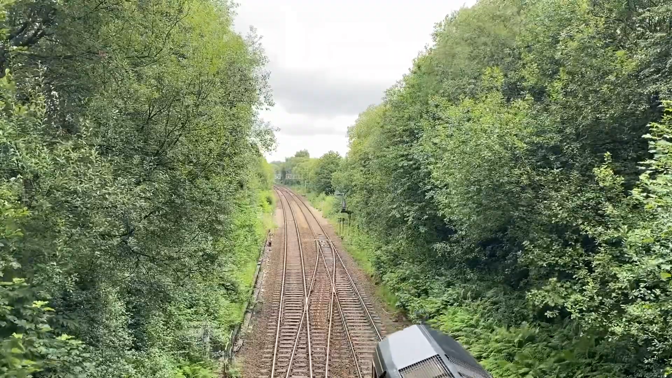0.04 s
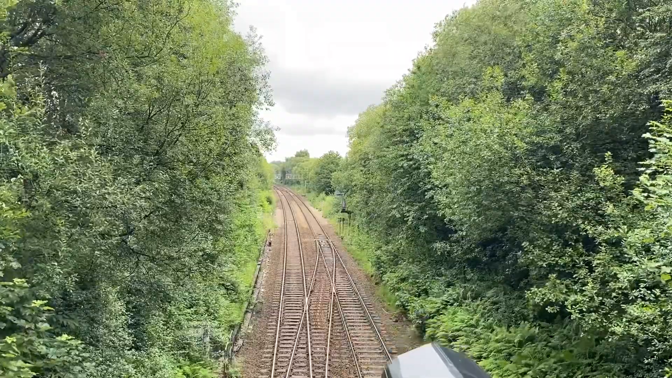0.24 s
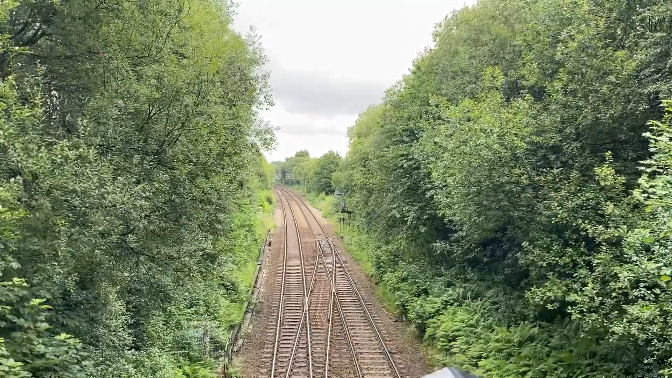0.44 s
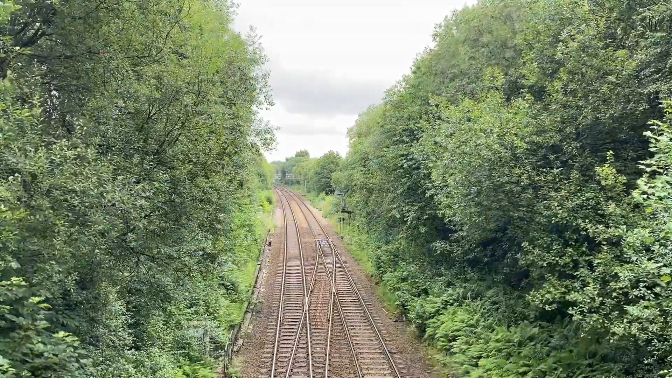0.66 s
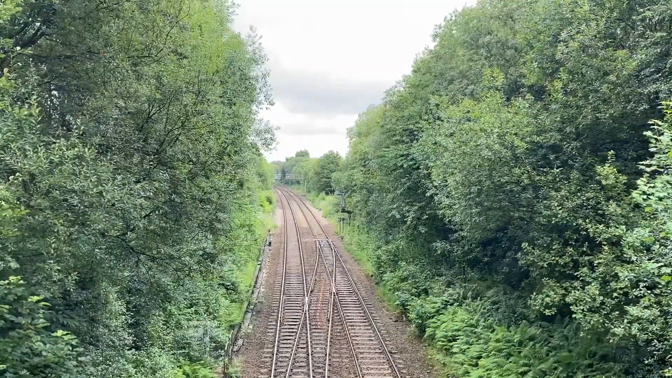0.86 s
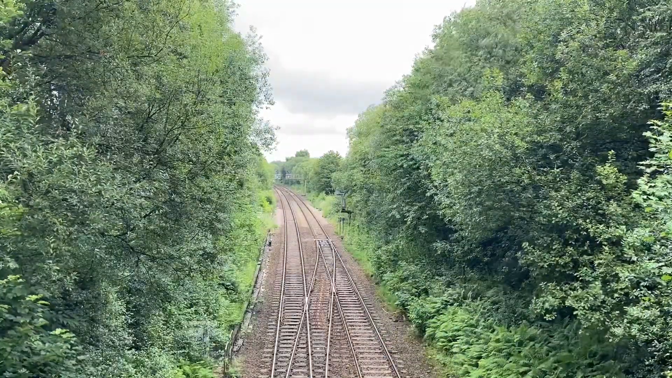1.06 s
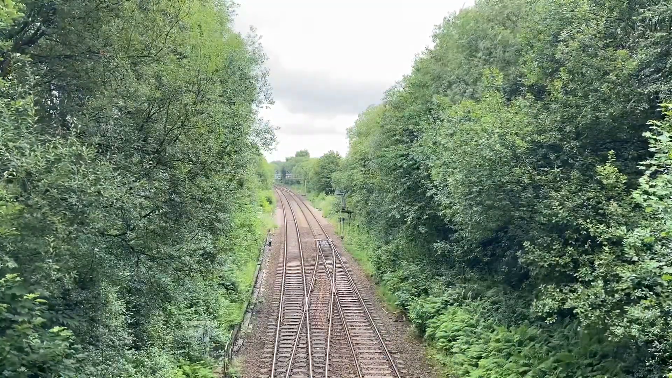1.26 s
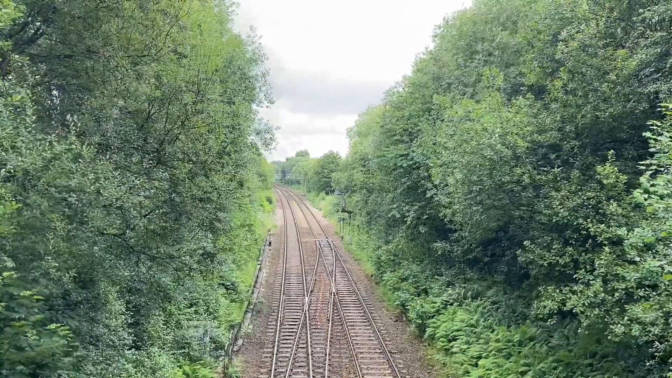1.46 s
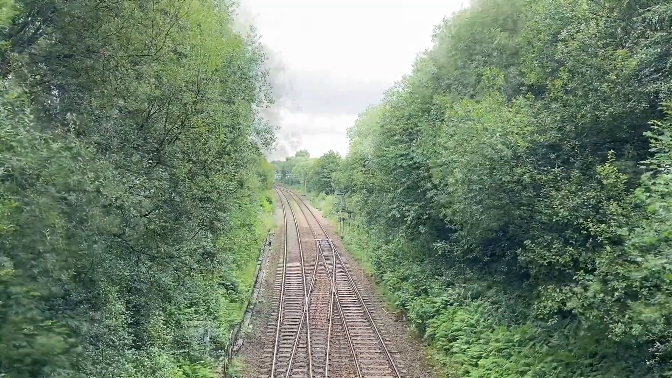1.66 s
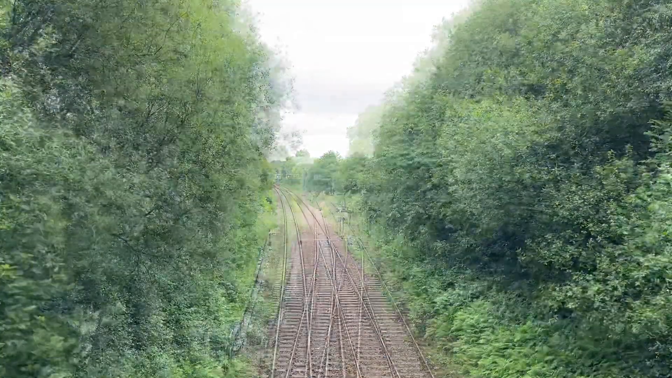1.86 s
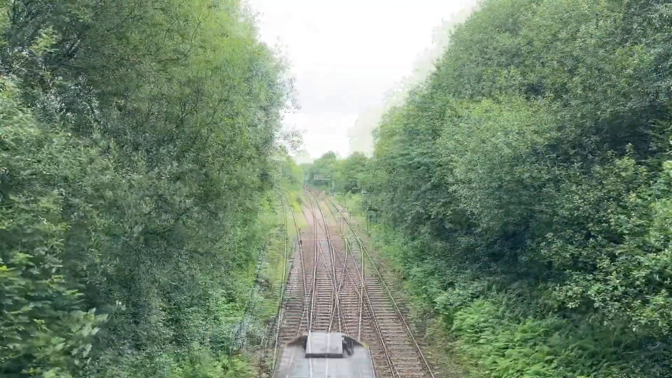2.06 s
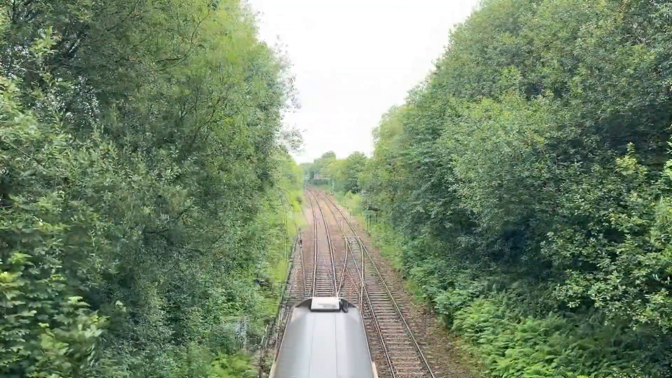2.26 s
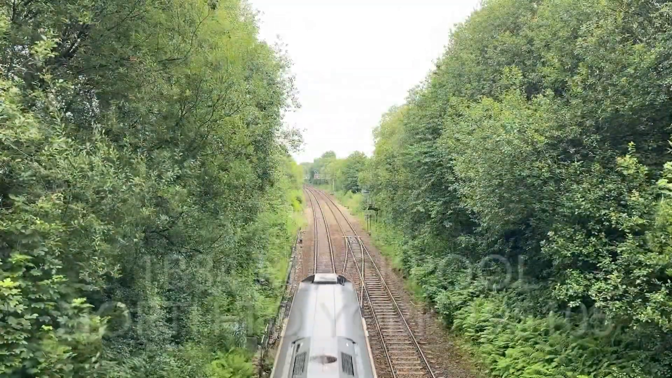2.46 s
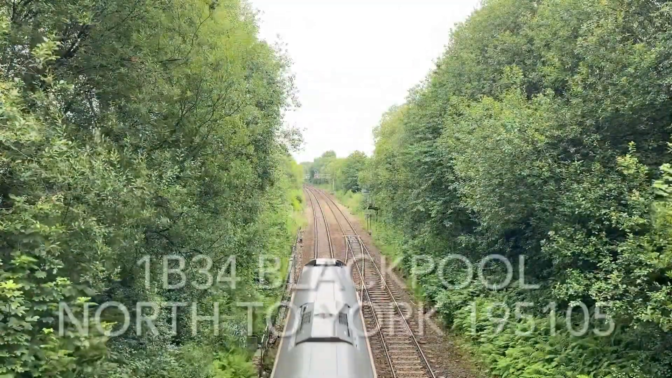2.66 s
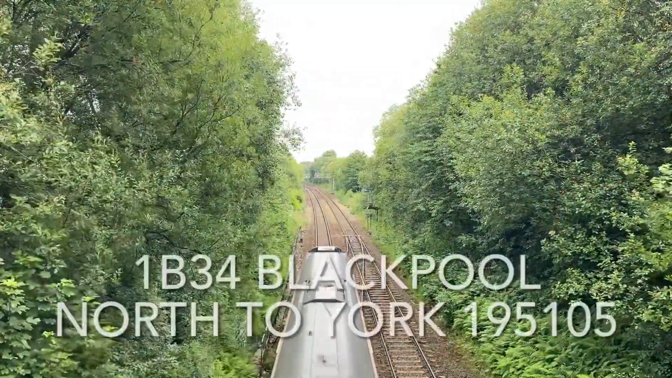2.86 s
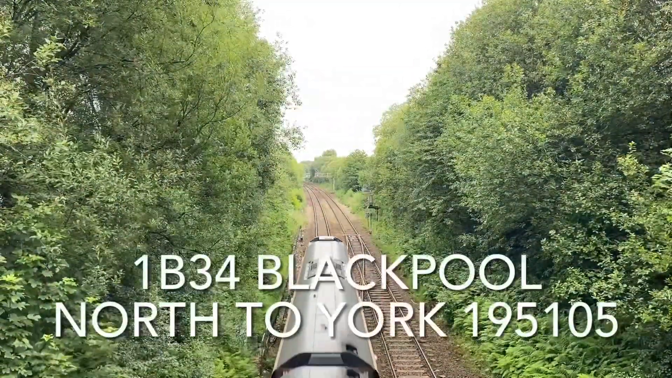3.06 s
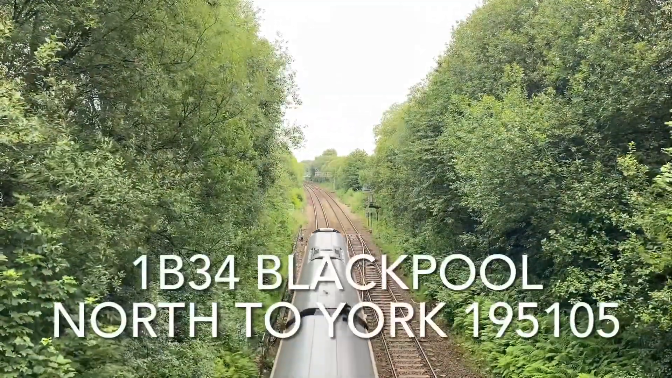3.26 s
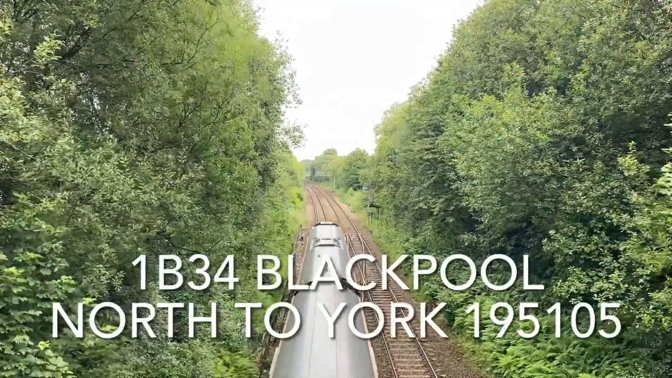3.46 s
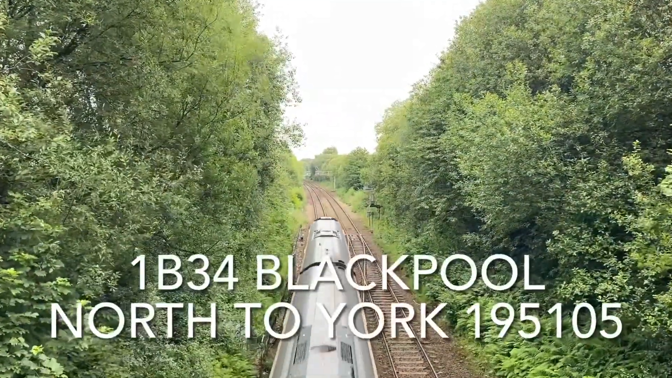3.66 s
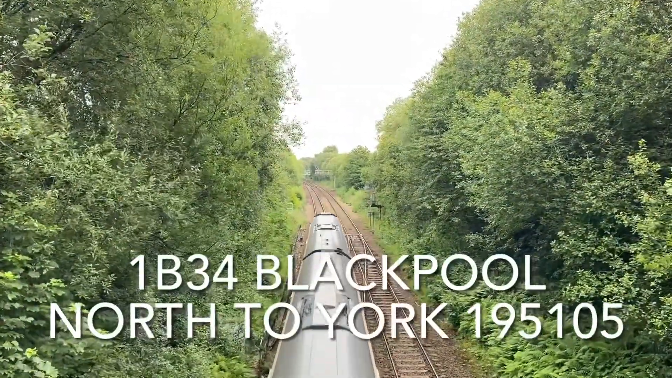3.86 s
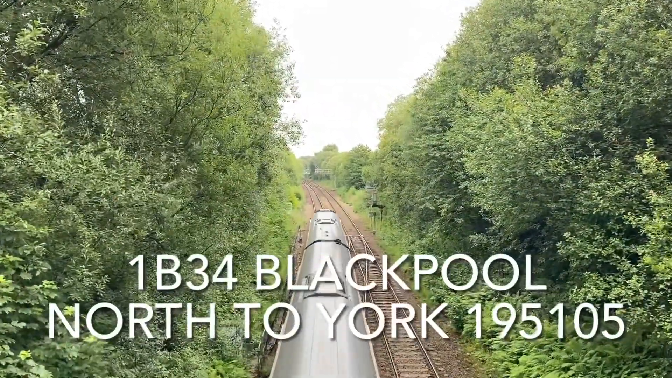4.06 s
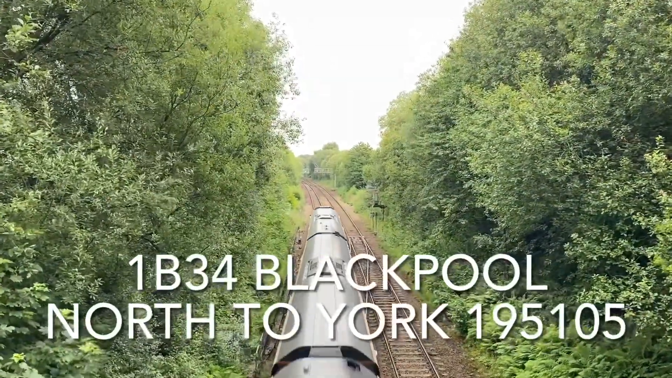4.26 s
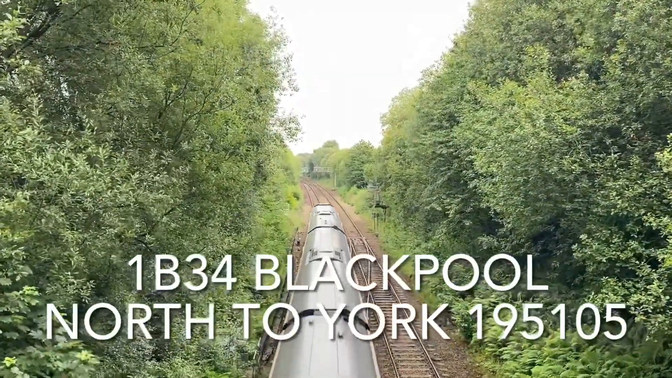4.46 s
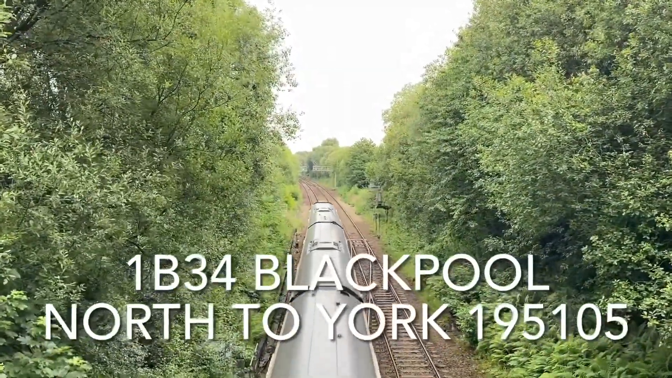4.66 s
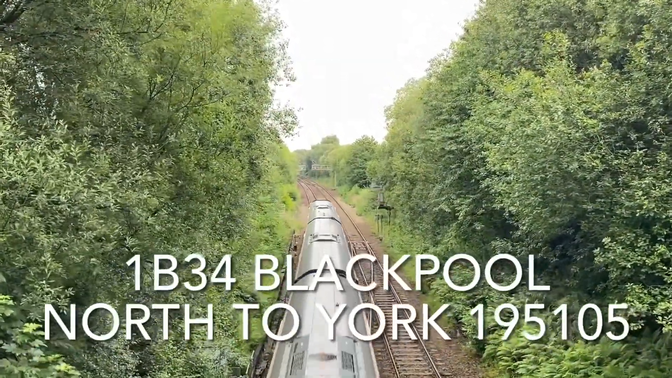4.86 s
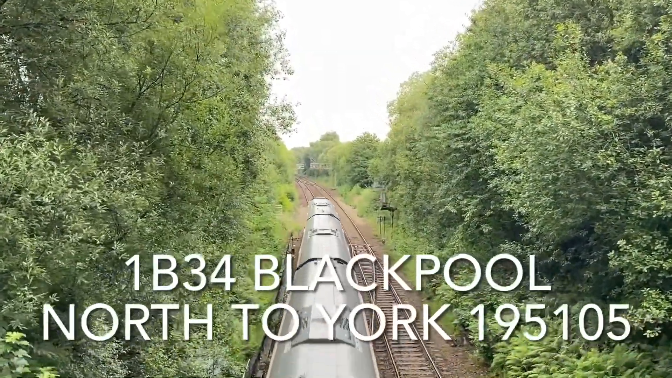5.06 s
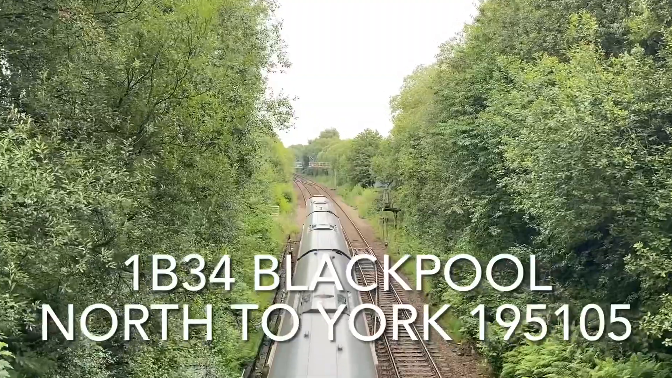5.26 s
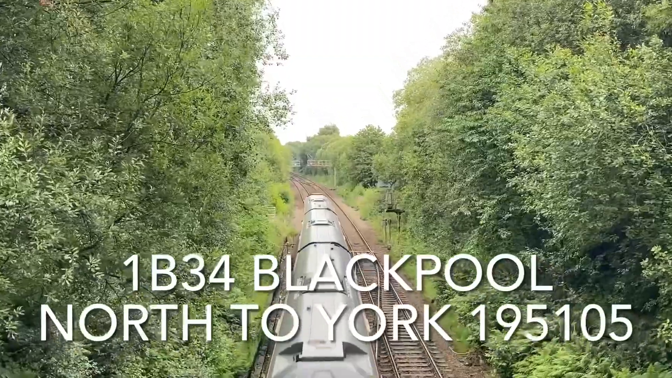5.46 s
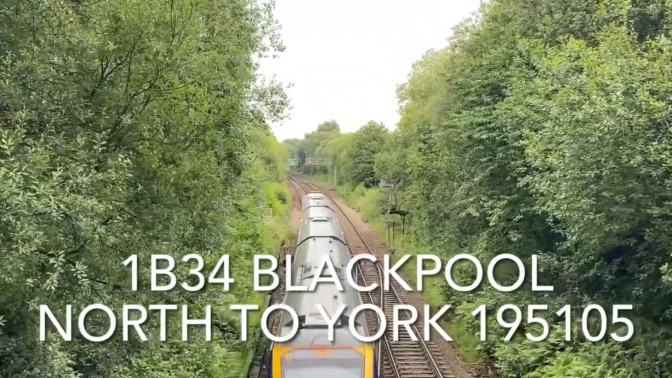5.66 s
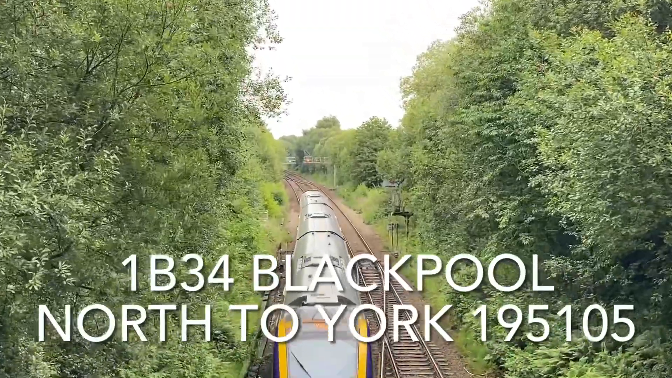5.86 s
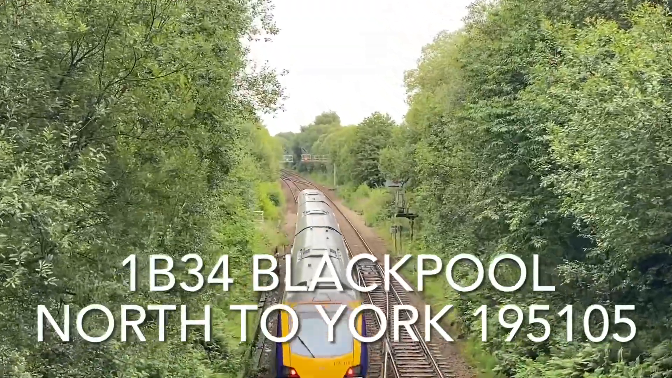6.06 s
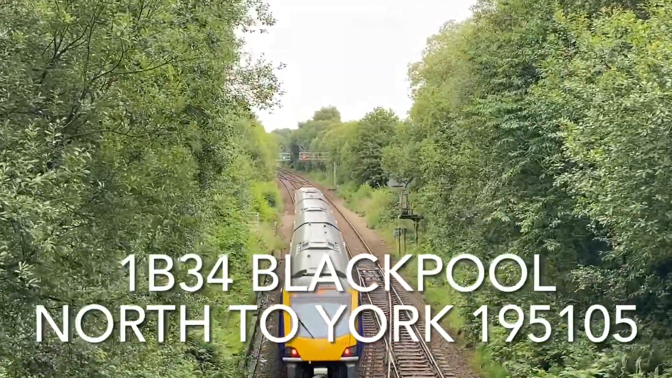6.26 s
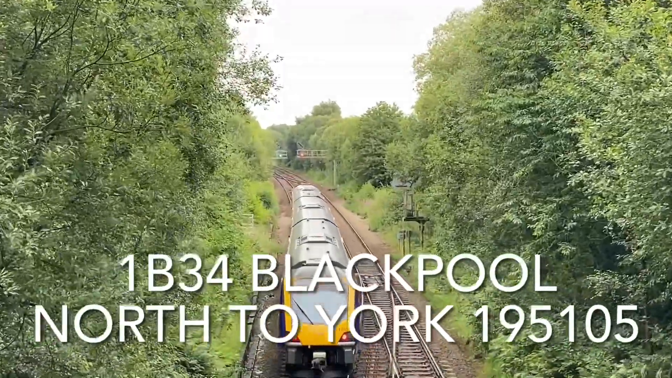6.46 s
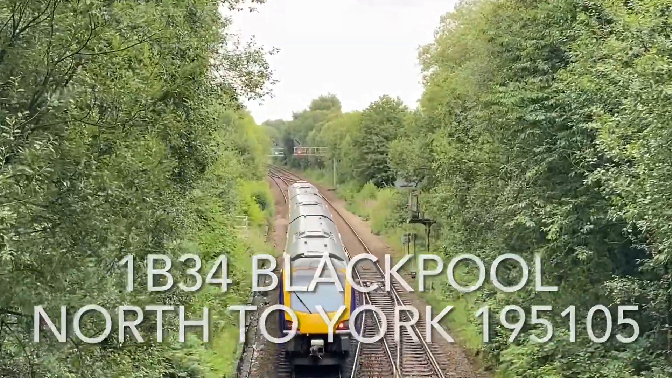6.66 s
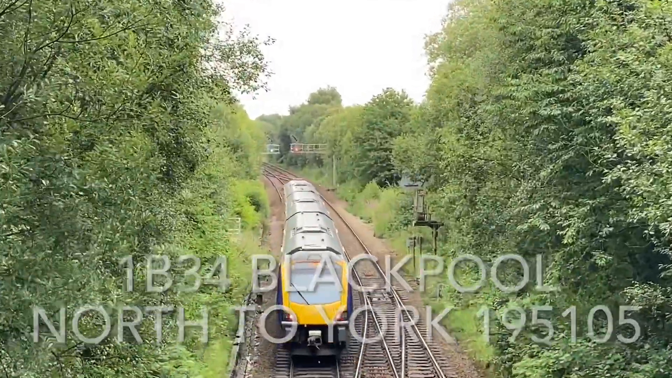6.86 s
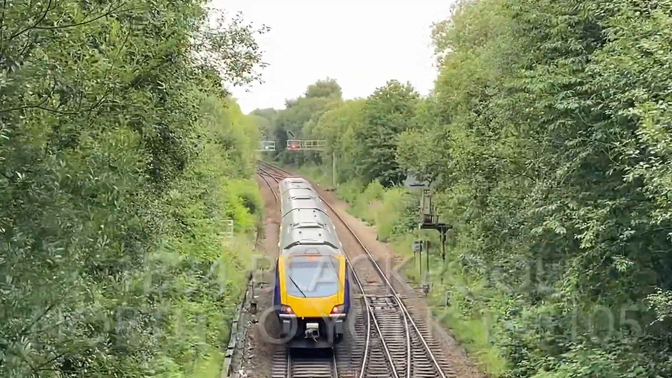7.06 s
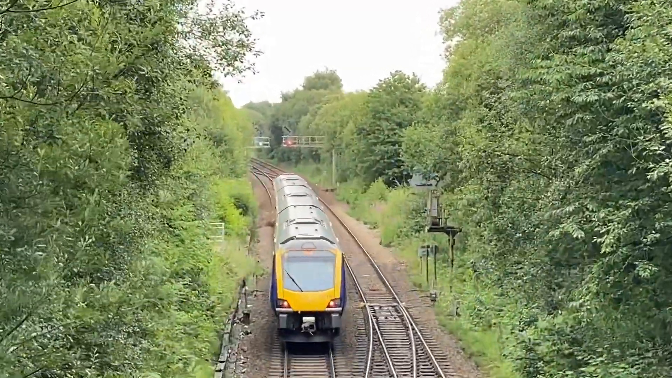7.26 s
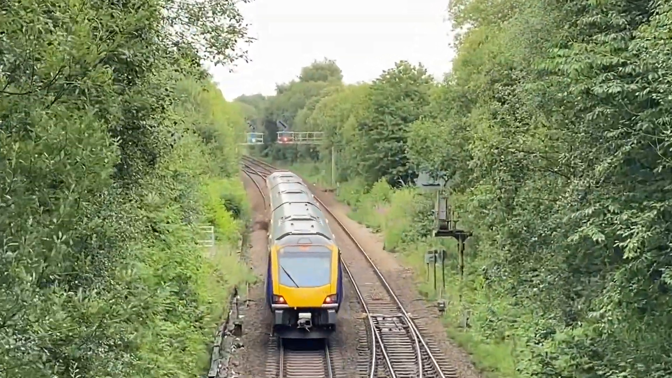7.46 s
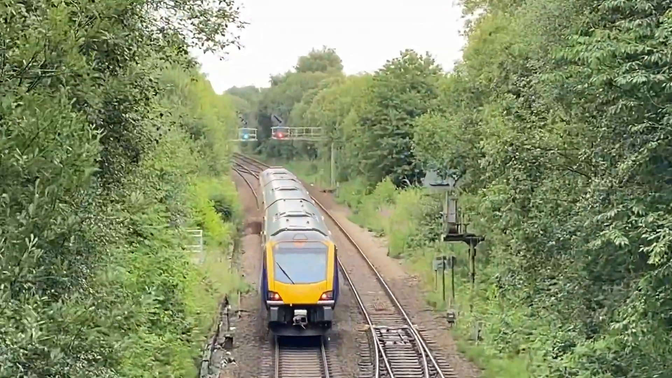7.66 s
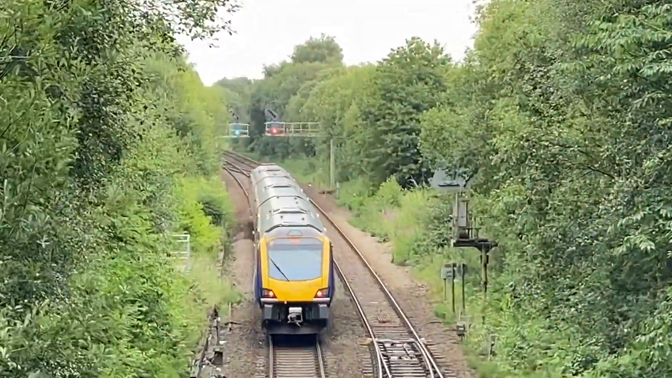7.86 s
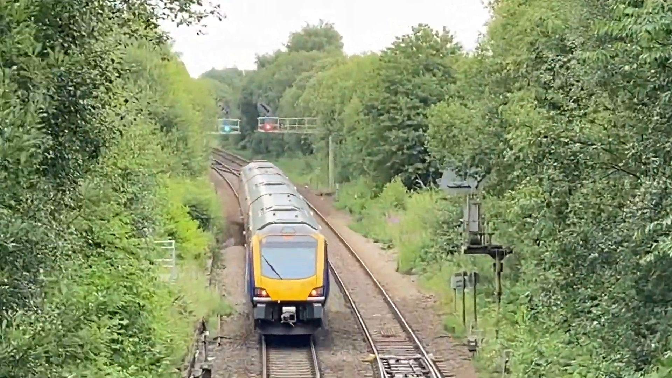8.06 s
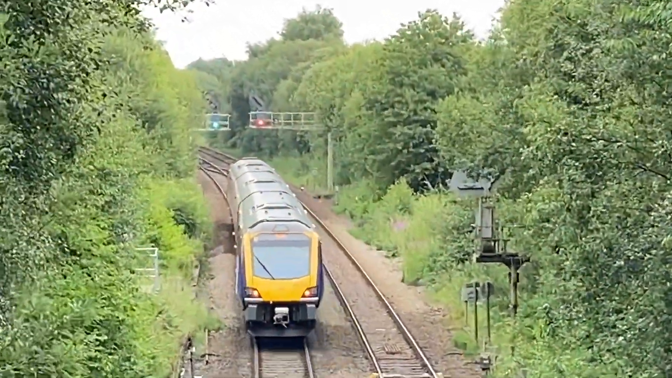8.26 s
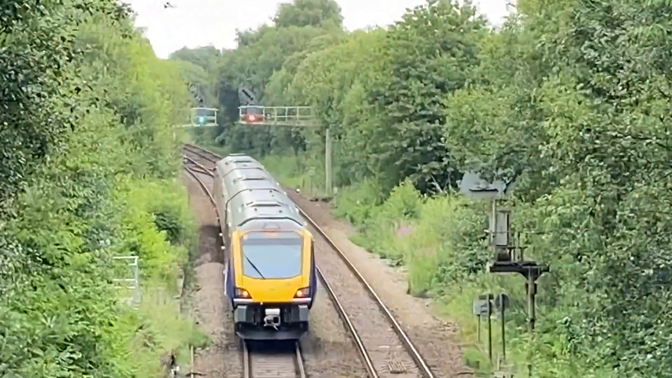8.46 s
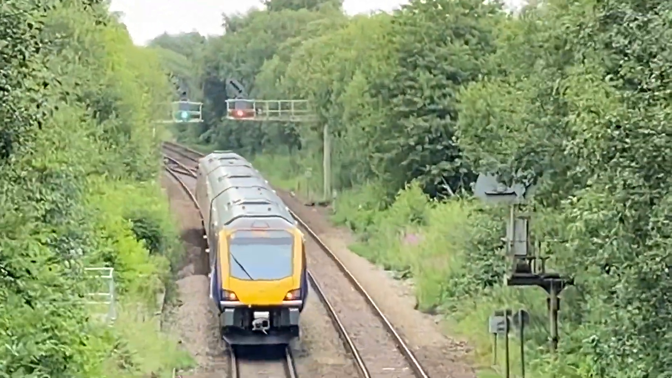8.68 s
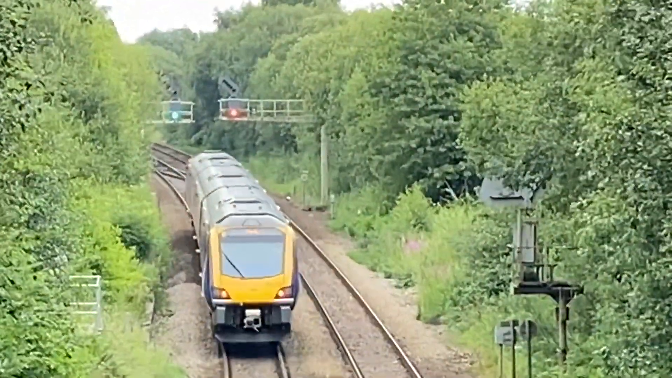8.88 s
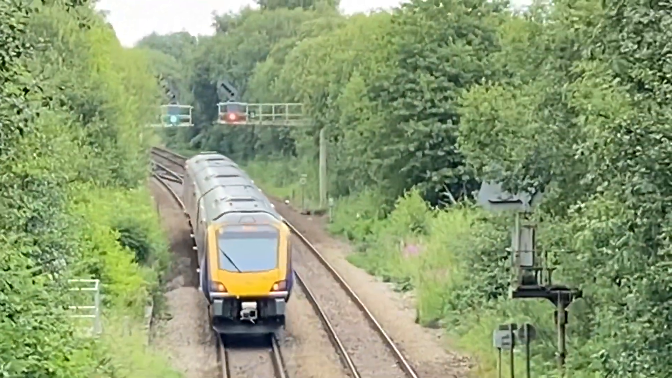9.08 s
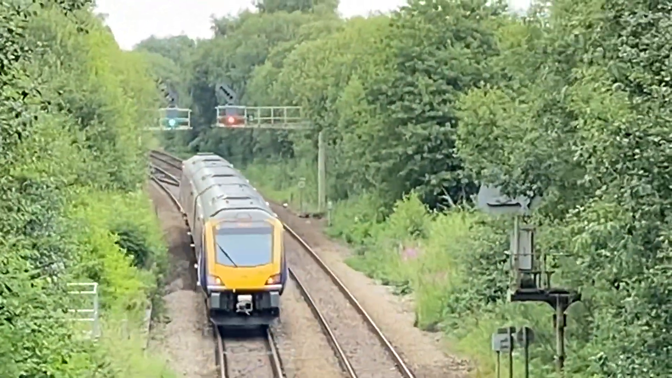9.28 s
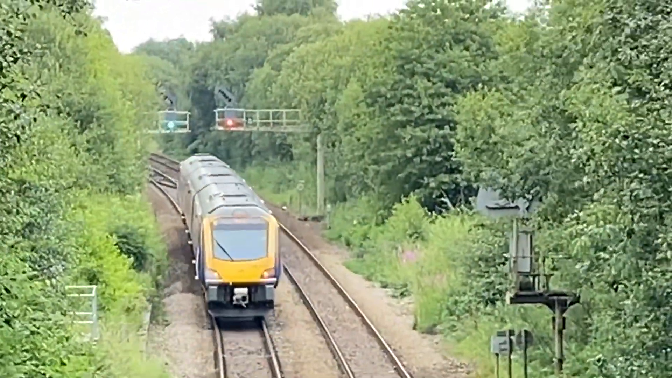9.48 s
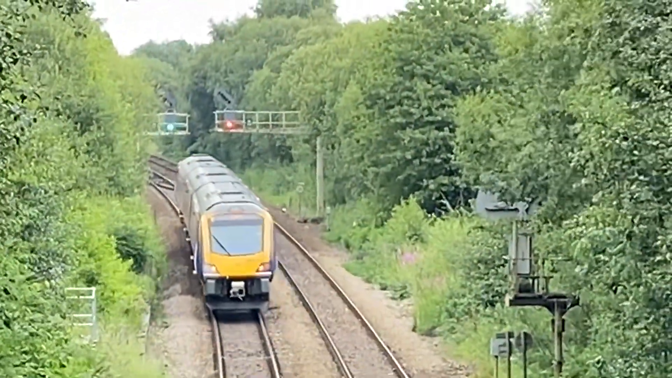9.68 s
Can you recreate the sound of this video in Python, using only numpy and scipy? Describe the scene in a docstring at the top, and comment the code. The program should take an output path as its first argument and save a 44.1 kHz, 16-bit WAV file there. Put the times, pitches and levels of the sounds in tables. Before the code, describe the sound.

Heard from a railway bridge, one train rolls away with fading rumble, ringing rails and a few brief flange squeals. Suddenly a diesel passenger train rushes out below, its drone and rolling roar swelling as its draught thumps and chokes the microphone. Wheels knock over rail joints and points, roof hiss passes, then the noise recedes along the line.

```python
"""A train rolls away with short flange squeals, then a diesel unit comes out from below, heard from a bridge.
The unit's engine drone is a sum of firing orders; its rolling roar, rail ring and roof hiss are shaped noise.
Its wheels knock over points as decaying modes with a clank of noise, and leaves rustle faintly.
The draught buffets the microphone; surges drive it towards its limit, which chokes all other sound."""
import sys
import numpy as np
from scipy import signal
from scipy.fft import rfft, irfft, next_fast_len
from scipy.io import wavfile
from scipy.ndimage import uniform_filter1d, map_coordinates

SR = 44100
rng = np.random.default_rng(int(sys.argv[2]) if len(sys.argv) > 2 else 0)


def transcribe(signal):
    """Save signal, clipped to [-1, 1], as a 16-bit WAV file at the path in sys.argv[1]."""
    frames = np.atleast_2d(signal).T
    limited = np.clip(frames, -1, 1)
    pcm = np.round(limited * 32767).astype(np.int16)
    wavfile.write(sys.argv[1], SR, pcm)


N = 428652

# the diesel unit clears the bridge between these times, gathering speed
HIDDEN_S, CLEAR_S = 1.68, 2.574
SPEED_M_PER_S, GAIN_M_PER_S2, WHEELBASE_M = 21.5, 0.55, 2.5  # speed at time 0, acceleration, axle spacing
LEAVES_S, HEIGHT_M = 4.73, 25.04  # when the noisy part starts to draw away, and its distance until then


def engine():
    """Interference: two engines 4 % apart in firing rate beat, and each passing outlet adds its power."""
    # engine speed as firing rate: time_s, rate_hz
    firing = [(2.1, 103.2), (2.35, 98.7), (2.52, 87.54), (4.4, 86.25), (9.72, 86.2)]
    # exhaust outlets passing below: middle_s, half_width_s, drone_db
    outlets = [(2.14, 0.14, -22.5), (2.67, .15, -5), (4.1, 0.33, -18), (6.35, 0.45, -33)]
    t = clock()
    rate = np.interp(t, *np.transpose(firing))
    pair = exhaust(rate) + amp(-14) * exhaust(rate * 1.04)
    # the drone that carries along the whole train
    power = amp(passing(open_db=-39.5, screen_db=6, loss_db=15)) ** 2
    for middle, half_width, db in outlets:
        closeness = 1 / (1 + ((t - middle) / half_width) ** 2)
        power = power + (amp(db) * closeness) ** 2
    return np.sqrt(power) * pair * ramp(1.6, 1.9)


def exhaust(rate):
    """Harmonic synthesis: an engine sounds at multiples of its firing rate, which wavers slightly."""
    # engine orders: multiple_of_firing_rate, relative_level_db
    orders = [(.5, -11), (1, -3.5), (2, -13), (2.5, -29), (3, -21.5)]
    phase = 2 * np.pi * np.cumsum(rate * (1 + 0.004 * wobble(20))) / SR
    tone = np.zeros(N)
    for k, db in orders:
        tone += amp(db + wobble(8)) * np.sin(k * phase + rng.uniform(0, 2 * np.pi))
    return unit(tone)


def carriages():
    """Broadband radiation: rough wheels shake bodies and rails with one shared judder, and roof fans hiss."""
    # spectra of the bodies, the roll nearby and far off, and the rails: frequency_hz, relative_level_db
    body_spectrum = [(60, -13), (105, -4), (140, -3), (170, -3), (215, -2.5), (245, -8), (300, -5),
                     (380, -14), (600, -21.5)]
    near_spectrum, far_spectrum = [(150, -5), (300, -7), (410, -1), (500, -1.5), (700, -5.5), (1000, -9),
                                   (1250, -12.5), (1500, -28), (2200, -38)], [(100, -39), (205, -1), (260, -5), (390, 2), (500, -1),
                                                      (590, -3.5), (700, 0.5), (980, -4.5), (1120, -11.5),
                                                      (1280, -11.5), (1500, -21.5), (2200, -20.5)]
    rail_spectrum = [(900, -21), (1350, 0), (1550, -3.5), (1750, -2), (2150, -3), (2700, -6), (3300, -7),
                     (4200, -11.5), (5000, -14), (6500, -60)]
    # hiss as the roof comes out, lies below and draws away: frequency_hz, relative_level_db
    front_spectrum = [(2500, -27), (4500, 1.5), (5500, 3.5), (8000, 0), (10000, -2.5), (11500, 1.5),
                      (12600, -8), (16000, -13)]
    above_spectrum = [(2500, -17), (4500, -3.5), (5200, -2), (6200, 0), (7400, -2.5), (8500, -3),
                      (9800, -9.5), (11500, -8), (14000, -12), (16000, -19)]
    behind_spectrum = [(2500, -21), (4500, -9), (5200, 1), (6200, 4), (7300, -7.5), (8500, 0.5),
                       (9500, -18), (11000, -10), (13500, -27), (16000, -31)]
    # the roll and hiss rise and dip, body and rail by about half the roll's change:
    # middle_s, half_length_s, roll_db, hiss_db
    level_changes = [(3.65, 0.29, 0.5, .5), (6.45, 0.11, 4, 4), (7.05, 0.47, -0.5, 2.5),
                     (7.604, 0.098, 2.5, -0.5), (8.463, 0.29, 5, 3), (9.47, 0.26, 5.5, 2)]

    far = ramp(5.74, 7.16)
    judder_db = wobble(40) * (1 - far / 2)  # distance blends the wheels into an even roll
    roll_change_db = sum(db * bump(s, half, half) for s, half, db, _ in level_changes)
    hiss_change_db = sum(db * bump(s, half, half) for s, half, _, db in level_changes)
    fans = bump(4.283, rise=0.5, fall=2.92)  # the roof fans pass below

    body_db = passing(open_db=-17.5, screen_db=19.5, loss_db=38.3) + 0.52 * roll_change_db + 2 * judder_db
    body = amp(body_db) * rush(body_spectrum, patchy_db=0.5)

    roll_db = passing(open_db=-20.5, screen_db=17.8, loss_db=24.1) + roll_change_db + judder_db
    roll = amp(roll_db) * blend(rush(near_spectrum, patchy_db=1.5), rush(far_spectrum, patchy_db=1.5), far)

    rail_db = passing(open_db=-33.5, screen_db=19, loss_db=24.6) + 0.56 * roll_change_db
    rail_db = rail_db + 3 * fans + judder_db / 2
    rail = amp(rail_db) * rush(rail_spectrum, patchy_db=0.43)

    air_db_per_m = 0.17  # extra loss of the hiss as the train draws away
    hiss_db = passing(open_db=-42.5, screen_db=16.5, loss_db=4.9) - air_db_per_m * gone()
    hiss_db = hiss_db + hiss_change_db + 9 * fans
    hiss = blend(rush(front_spectrum, patchy_db=0.1), rush(above_spectrum, patchy_db=1.1), ramp(3.0, 4.25))
    hiss = amp(hiss_db) * blend(hiss, rush(behind_spectrum, patchy_db=1.5), ramp(4.5, 8.5))
    return (body + roll) * ramp(1.62, 1.67) + (rail + hiss) * ramp(1.5, 1.86)


def knocks():
    """Impact excitation: each axle of a bogie drops into a gap, ringing damped modes and clanking fittings."""
    # bogies crossing rail gaps, levels relative:
    # front_axle_s, front_axle_db, rear_axle_db, clank_over_thud_db (before a fixed offset)
    crossings = [(1.714, -8, -4.5, -17.5), (2.183, -24, -4, -14.5), (2.618, 7, -12, -34),
                 (2.765, -4, -5.5, -15), (3.415, 1, 0.5, -16.5), (3.641, 1, 8, -25), (3.995, 2, -1.5, -18),
                 (4.165, -8, 2, -17), (4.541, 2.5, 1.5, -17.5), (4.768, 2, 7, -23.5),
                 (4.947, -1.5, -2.5, -16), (5.397, -2.5, -7.5, -17), (5.621, 4.5, 2.5, -17.5),
                 (5.857, -5, 0, -10.5), (6.054, 1, 4, -12.5), (6.397, -5, -1.5, -24),
                 (6.825, -3, -1, -11.5)]
    # mean bogie modes: frequency_hz, relative_level_db, decay_by_60_db_s
    modes = [(139.4, -1, 0.23), (164.3, 1, 0.19), (208.2, -1, 0.14), (284.5, -6.5, 0.14), (386.4, -9, 0.14)]
    # clank spectrum: frequency_hz, relative_level_db
    clank_spectrum = [(150, -15), (350, 6), (650, 4), (1000, -4.5), (1500, -17.5), (2400, -22), (5000, -34)]
    out, t = np.zeros(N + SR), np.arange(SR // 2) / SR
    rattle = rush(clank_spectrum)
    attack = 1 - np.exp(-t / 0.003)
    clank_decay = amp(-60 * t / 0.085) + amp(-12.5 - 60 * t / 0.22)
    for start, front_db, rear_db, clank_db in crossings:
        rear_start = start + WHEELBASE_M / speed(start)
        for s, db in ((start, front_db), (rear_start, rear_db)):
            thud = np.zeros(len(t))
            for hz, level, t60 in modes:
                envelope = amp(level + rng.normal(0, 2.3) - 60 * t / t60)
                turns = hz * rng.normal(1, 0.049) * t + rng.random()
                thud += envelope * np.sin(2 * np.pi * turns)
            clank = rattle[rng.integers(N - len(t)):][:len(t)] * clank_decay
            knock = amp(db - 5.5) * peak_one(thud * attack)
            knock += amp(db + clank_db + 5.0) * peak_one(clank * attack)
            out[round(s * SR):][:len(t)] += knock
    return out[:N]


def groan():
    """Friction sound: wheels groan briefly through the points, as a narrow band of noise."""
    # groan spectrum: frequency_hz, relative_level_db
    groan_spectrum = [(500, -30), (660, -1), (700, 6), (740, -21), (900, -32)]
    return amp(-29.0) * rush(groan_spectrum) * ramp(6.26, 6.34) * (1 - ramp(6.52, 6.66))


def first_train():
    """Exponential decay: rolling noise, engine hum, ringing rails and singing wheels fade behind the bridge."""
    # rolling and rail ring spectra: frequency_hz, relative_level_db
    roll_spectrum, ring_spectrum = [(60, 0.5), (130, -6.5), (186, -6), (245, -6.5), (350, -8), (450, -9.5),
                                    (520, -12), (790, -13.5), (950, -20.5), (1300, -25), (1500, -44),
                                    (1950, -49)], [(1000, 2.5), (1400, 1), (1580, -4), (1800, 2),
                                                        (2100, 0.5), (2700, -5), (3100, -7), (3300, -8),
                                                        (3420, -6), (3600, -7), (4200, -15.5),
                                                        (7000, -23.5), (10000, -36), (16000, -43)]
    # mean engine lines: frequency_hz, level_relative_to_rolling_db
    hum_lines = [(106, -11.5), (186, -11.5), (321, -8), (382, -13.5), (644, -15), (792, -27)]
    # mean wheel modes that keep singing: frequency_hz, level_relative_to_ring_db
    whine_lines = [(1795, -27), (3280, -18.5), (3590, -15.5)]
    t = clock()
    roll = rush(roll_spectrum) + tones(hum_lines, drift=0.0058, rate=20.1)
    ring = rush(ring_spectrum, patchy_db=1.0) + tones(whine_lines, drift=0.0066, rate=130)
    # level at time 0 in dB, less the fading in dB per second
    fading = amp(-22.5 - 6.5 * t) * roll + amp(-33.5 - 9.5 * t) * ring
    return fading * (1 - ramp(1.42, 2.07))


def squeals():
    """Stick-slip friction: a flange rubs the rail and sets the wheel's inharmonic partials singing unsteadily."""
    # flange squeals, mean pitch and level: middle_s, length_s, pitch_hz, level_db
    rubs = [(0.136, .13, 1808, -31.5), (.45, .11, 1795, -35.5), (0.733, .1, 1756, -42),
            (1.049, .12, 1760, -52)]
    # wheel partials: multiple_of_pitch, relative_level_db
    partials = [(.44, 0.5), (1, 1.5), (1.831, -12), (2.019, -8), (3, -23), (4.97, -30)]
    t, out = clock(), np.zeros(N)
    jitter = 0.0116 * wobble(170)
    for s, length, hz, db in rubs:
        near = np.abs(t - s) < 2 * length
        phase = 2 * np.pi * np.cumsum(hz * (1 + jitter[near])) / SR
        swell = amp(db) * np.exp(-(2 * (t[near] - s) / length) ** 2)
        out[near] += swell * sum(amp(level) * np.sin(k * phase) for k, level in partials)
    return out * amp(1 + 2.5 * wobble(90))


def wind():
    """Turbulent pressure: the draught heaves and flutters; a surge displaces it with broad swell and sharp core."""
    # slow heave and faster flutter spectra: frequency_hz, relative_level_db
    heave_spectrum, flutter_spectrum = [(1, 10), (3, 6), (8, -6.5), (14, -1), (24, -44), (50, -57)], [(10, -32), (22, 5), (45, -3), (68, -5), (90, -18.5),
                                                       (125, -30), (250, -27), (700, -72)]
    strength = draught()
    heave = 0.57 * np.tanh(amp(20.5) * strength * rush(heave_spectrum))  # soft ceiling
    flutter = strength * amp(1.5 * wobble(12)) * rush(flutter_spectrum)
    swell = np.tanh(2 * eddies(rise=0.022, release=0.022))
    flow = 0.65 * swell + (1 - np.abs(swell)) * heave + flutter
    core = eddies(rise=0.0032, release=0.00082)  # lets go more sharply than it builds
    moving_air = core + flow * np.clip(1 - np.abs(core), 0, 1)
    return moving_air * ramp(0, 0.02) * (1 - ramp(9.68, 9.72))


def eddies(rise, release):
    """Pressure pulses: each surge is a smooth step up, then a step back; rise and release in seconds."""
    # surges, with nominal pressure before limiting: onset_s, length_s, pressure_full_scales
    surges = [(1.937, .021, -1.14), (1.983, .031, 1.2), (2.016, 0.028, 1.16), (2.202, 0.044, 1.4),
              (2.262, 0.0252, -1.43), (2.436, 0.047, -2), (2.487, .031, 2), (2.547, 0.021, 1.25),
              (2.721, 0.0213, 2), (3.154, 0.027, -1.5), (3.247, 0.0066, 4.5), (3.929, .03, -1.55),
              (4.14, 0.034, 1.5), (4.192, .014, -2), (4.965, .011, -1.5)]
    out, t = np.zeros(N), np.arange(-SR // 5, SR // 4) / SR
    for s, length, pressure in surges:
        pulse = (np.tanh(t / rise) - np.tanh((t - length) / release)) / 2
        out[round((s + t[0]) * SR):][:len(t)] += pressure * pulse
    return out


def draught():
    """Power addition: the air flow's strength from a breeze, the decaying wakes of the trains and their gusts."""
    # wake of air dragged by each train: start_s, level_at_start_db, fading_db_per_s
    wake_rows = [(0, -21.5, 7.5), (1.7, -19, 2.9)]
    # gusts within the wake: middle_s, half_length_s, level_db
    gust_rows = [(1.757, .1, -18), (2.56, 0.25, -5), (4.303, .3, -18.5), (4.994, 0.15, -17.5),
                 (5.776, 0.16, -18)]
    t = clock()
    wakes = [amp(db - fade * (t - s)) * ramp(s, s + 0.031) for s, db, fade in wake_rows]
    gusts = [amp(db) * bump(s, half, half) for s, half, db in gust_rows]
    breeze = amp(-47)
    return np.sqrt(breeze ** 2 + sum(part ** 2 for part in wakes + gusts))


def trees():
    """Superposed random contacts: many leaves make a faint patchy rustle of shaped noise."""
    # leaf spectrum: frequency_hz, relative_level_db
    leaf_spectrum = [(1000, -24), (4000, -13), (7000, -1), (10000, -13), (16000, -25)]
    return amp(-65.5) * rush(leaf_spectrum, patchy_db=3.5)


def speed(s):
    """Uniform acceleration: the diesel unit's speed in m/s at a time."""
    return SPEED_M_PER_S + GAIN_M_PER_S2 * s


def gone():
    """Kinematics: metres that the diesel unit has drawn away, its speed summed over time."""
    t = clock()
    return np.cumsum(speed(t) * (t > LEAVES_S)) / SR


def passing(open_db, screen_db, loss_db):
    """Screening and spreading: dB in the open, less the bridge's screen and a loss per tenfold distance."""
    screened = 1 - ramp(HIDDEN_S, CLEAR_S)
    relative_distance = np.hypot(1, gone() / HEIGHT_M)
    return open_db - screen_db * screened - loss_db * np.log10(relative_distance)


def tones(lines, drift, rate):
    """Frequency and amplitude modulation: sines that waver in pitch and level."""
    out = np.zeros(N)
    for hz, db in lines:
        level = amp(db + 2.3 * wobble(rate / 3))
        out += level * np.sin(2 * np.pi * np.cumsum(hz * (1 + drift * wobble(rate))) / SR)
    return out


def rush(spectrum, patchy_db=0):
    """Spectral shaping: coloured noise of rms 1 with random gain patches in time and frequency."""
    z = signal.stft(rng.standard_normal(N), nperseg=512)[2]
    field = uniform_filter1d(rng.standard_normal(z.shape), size=4, axis=0)  # smooth over frequency
    field = uniform_filter1d(field, size=10, axis=1)  # and over time
    noise = signal.istft(z * amp(patchy_db * unit(field)), nperseg=512)[1][:N]
    f, db = np.transpose(spectrum)

    def response(hz):
        """Interpolation in dB over log frequency, all but silent outside the spectrum."""
        return amp(np.interp(np.log(hz + 1), np.log(f + 1), db, left=-120, right=-120))

    return unit(filtered(noise, response))


def filtered(x, response):
    """Linear filtering: x times a response in the frequency domain."""
    m = next_fast_len(N + SR // 2)
    return irfft(rfft(x, m) * response(np.fft.rfftfreq(m, 1 / SR)), m)[:N]


def blend(a, b, share):
    """Power conservation: cross-fade two unrelated noises at constant power."""
    return np.sqrt(1 - share) * a + np.sqrt(share) * b


def wobble(rate):
    """Band-limited randomness: a smooth random curve with rate knots a second."""
    return map_coordinates(rng.standard_normal(int(N * rate / SR) + 4), [np.arange(N) * rate / SR])


def bump(s, rise, fall):
    """Gaussian envelope: height 1 at time s, down to 1/e after rise or fall seconds on either side."""
    t = clock() - s
    return np.exp(-(t / np.where(t < 0, rise, fall)) ** 2)


def ramp(start, end):
    """Linear envelope: a rise from 0 to 1 between two times."""
    return np.clip((clock() - start) / max(end - start, 1 / SR), 0, 1)


def clock():
    """Sampling: the time of each sample in seconds."""
    return np.arange(N) / SR


def amp(db):
    """Logarithmic level: decibels to gain."""
    return 10 ** (np.asarray(db) / 20)


def unit(x):
    """Power normalisation: scale to rms 1."""
    return x / np.sqrt(np.mean(x ** 2) + 1e-20)


def peak_one(x):
    """Peak normalisation: scale the largest excursion to 1."""
    return x / np.abs(x).max()


def scene():
    """Superposition: both trains, the trees and the moving air add at the parapet."""
    diesel_unit = engine() + carriages() + knocks() + groan()
    departing_train = first_train() + squeals()
    return (diesel_unit + departing_train + wind() + trees())[None]


def record(dry):
    """Saturation: the microphone flattens whatever rides on a surge; then a sharp band limit."""
    top_hz = 16100
    held = 0.96 * dry[0] / (1 + np.abs(dry[0]) ** 8) ** (1 / 8)
    return filtered(held, lambda hz: hz < top_hz)[None]


dry = scene()
out = record(dry)
transcribe(out)
```